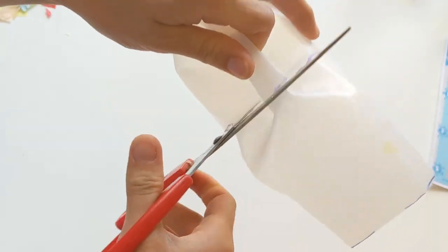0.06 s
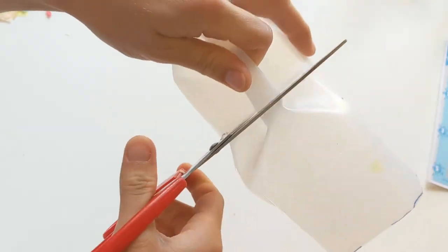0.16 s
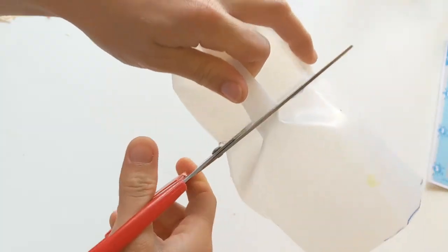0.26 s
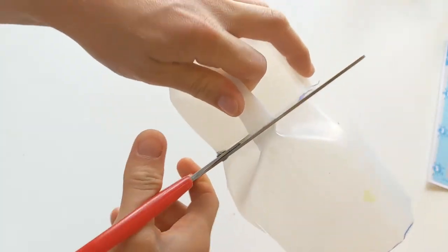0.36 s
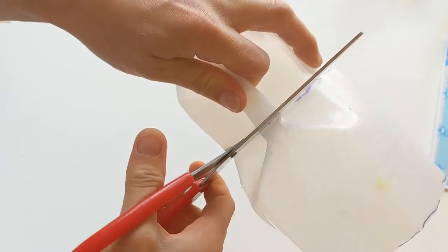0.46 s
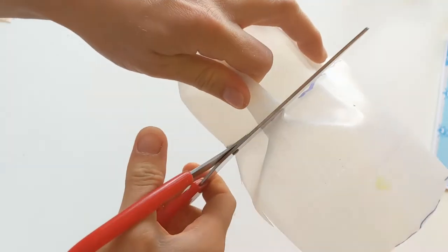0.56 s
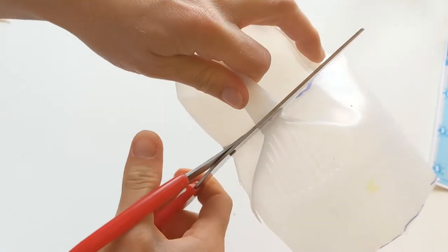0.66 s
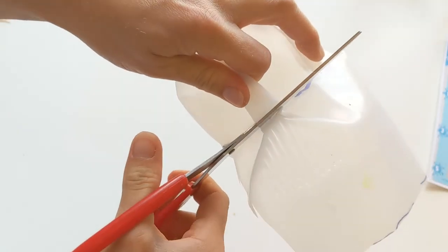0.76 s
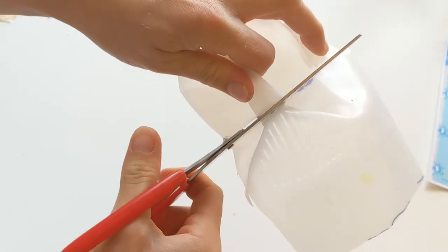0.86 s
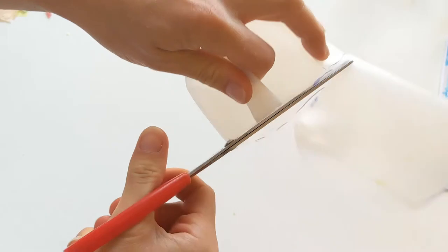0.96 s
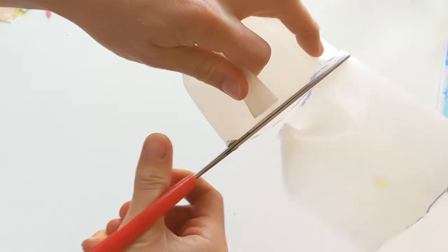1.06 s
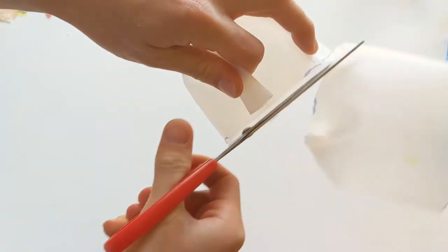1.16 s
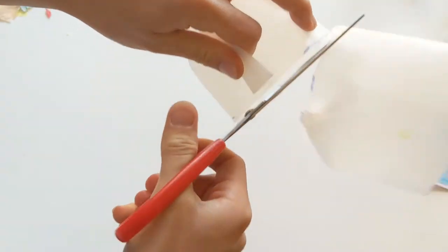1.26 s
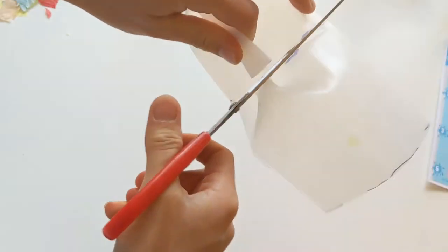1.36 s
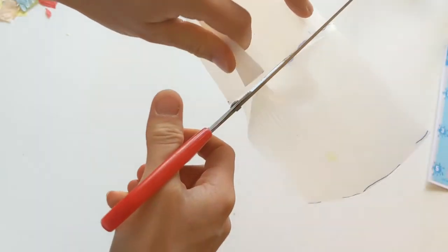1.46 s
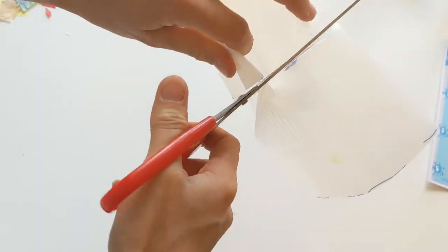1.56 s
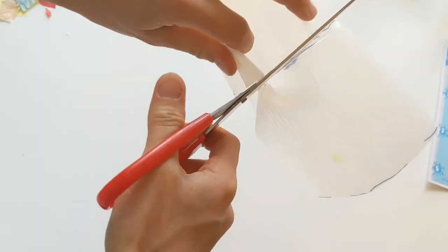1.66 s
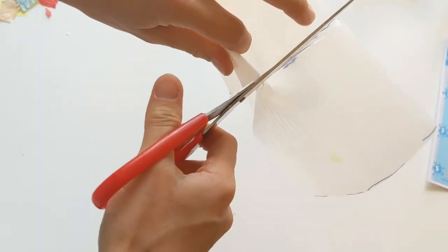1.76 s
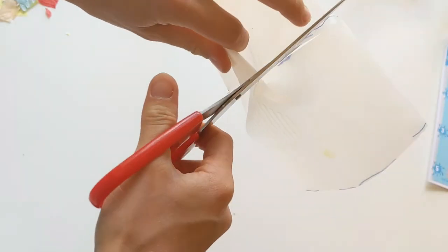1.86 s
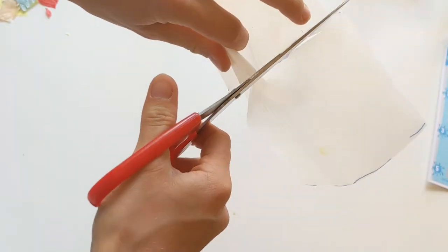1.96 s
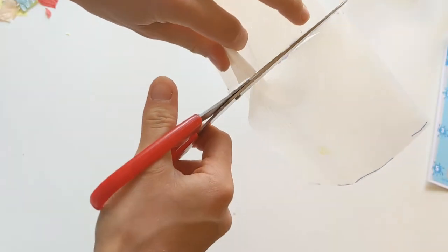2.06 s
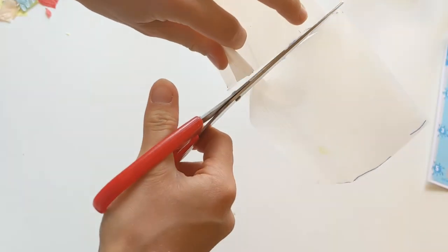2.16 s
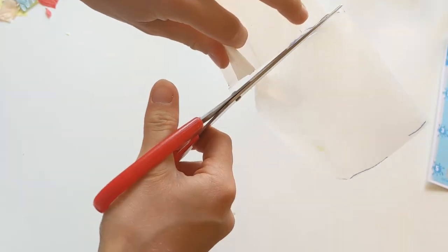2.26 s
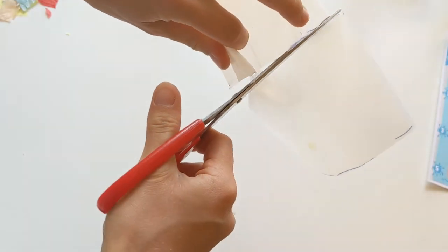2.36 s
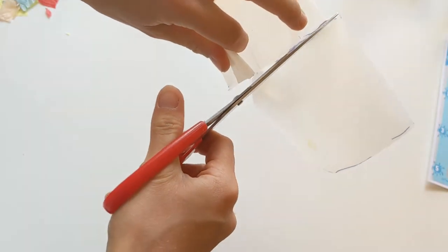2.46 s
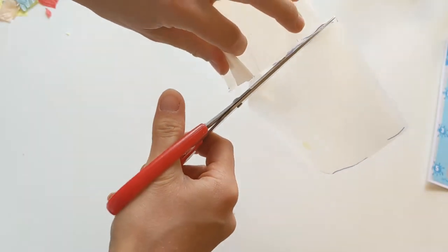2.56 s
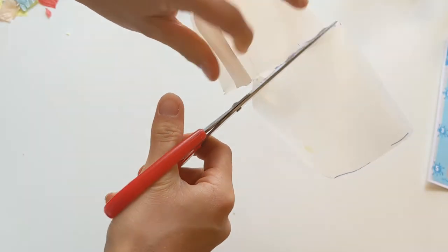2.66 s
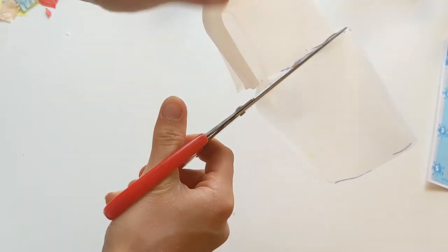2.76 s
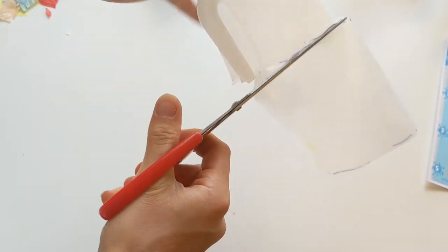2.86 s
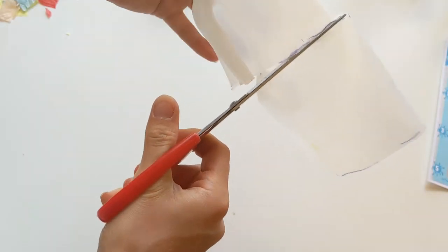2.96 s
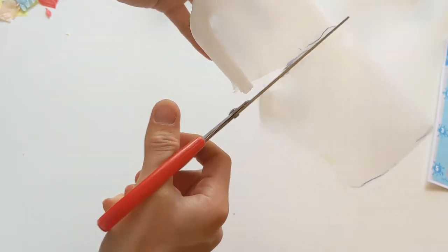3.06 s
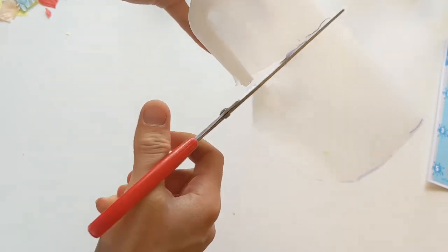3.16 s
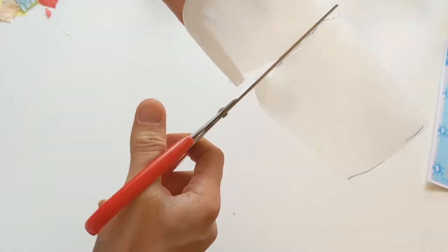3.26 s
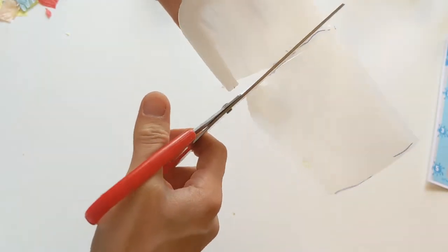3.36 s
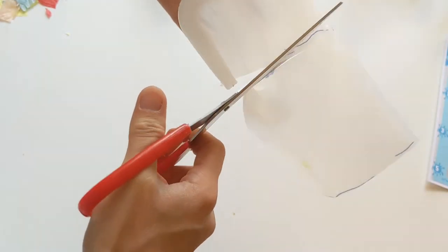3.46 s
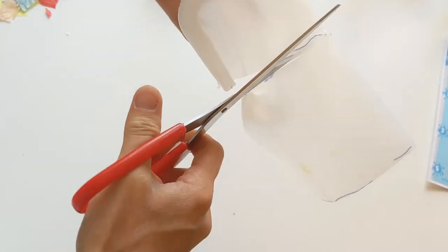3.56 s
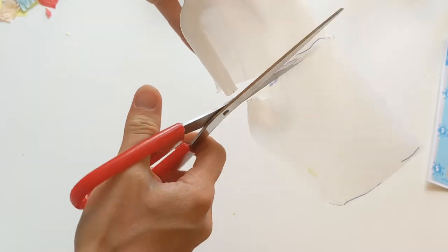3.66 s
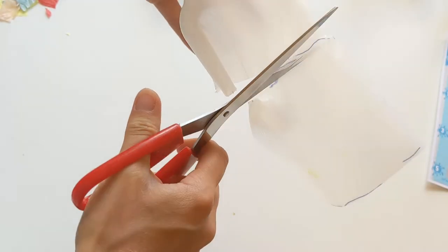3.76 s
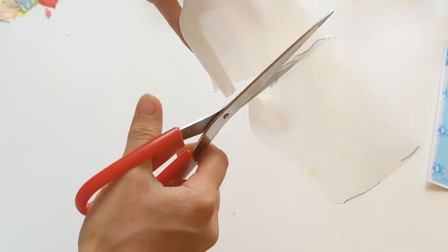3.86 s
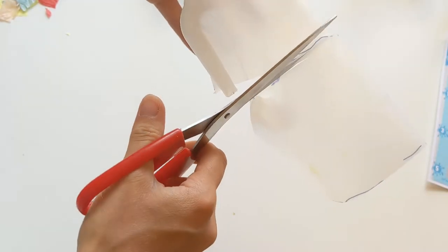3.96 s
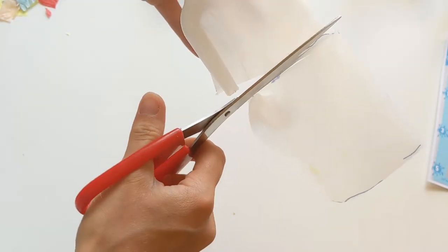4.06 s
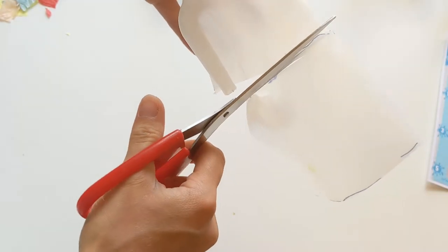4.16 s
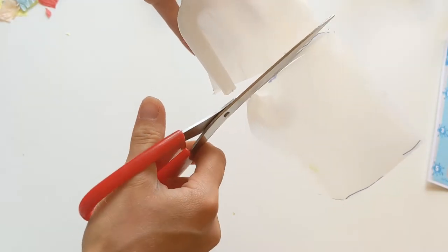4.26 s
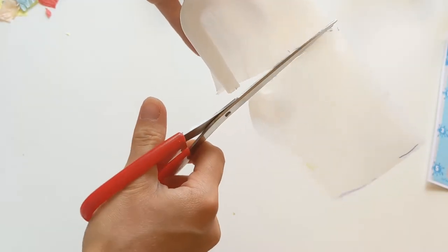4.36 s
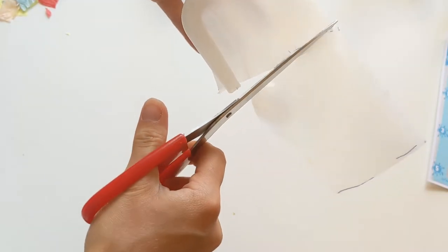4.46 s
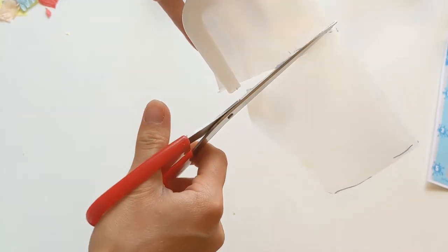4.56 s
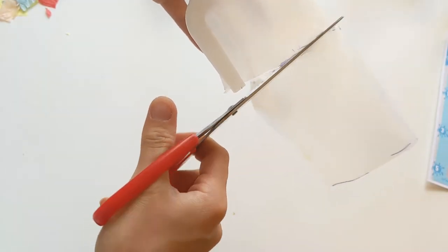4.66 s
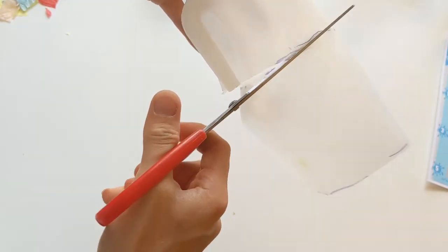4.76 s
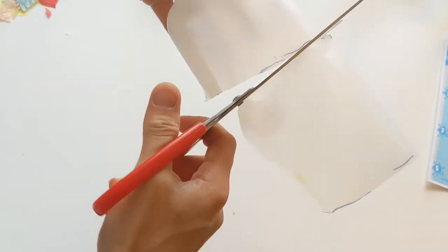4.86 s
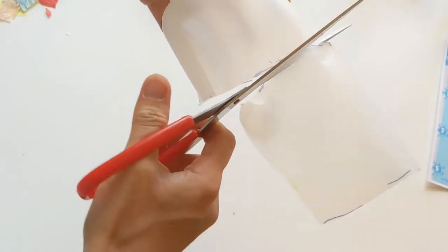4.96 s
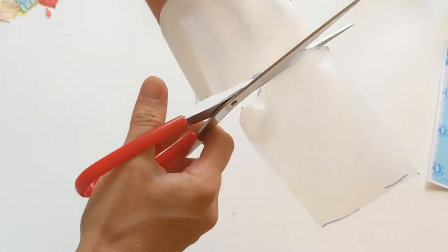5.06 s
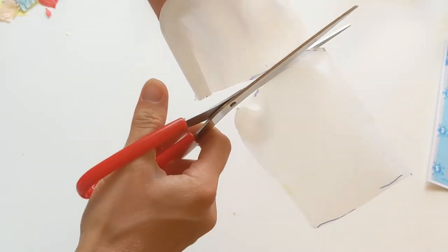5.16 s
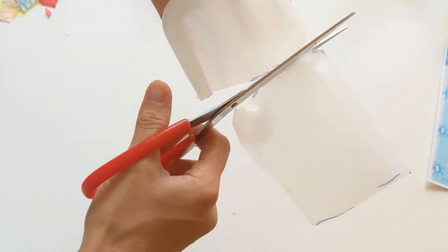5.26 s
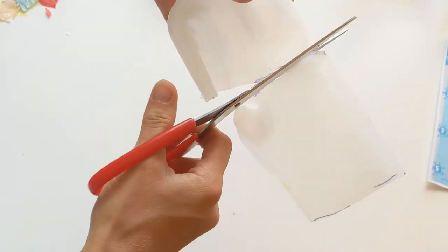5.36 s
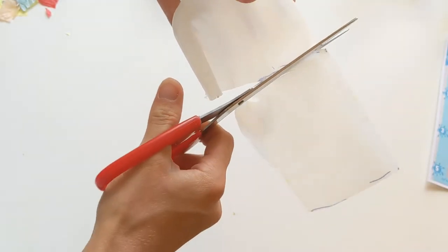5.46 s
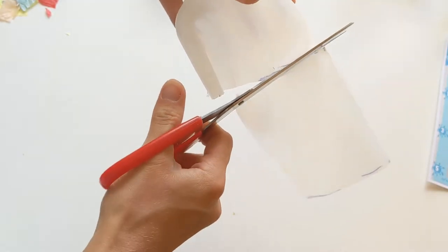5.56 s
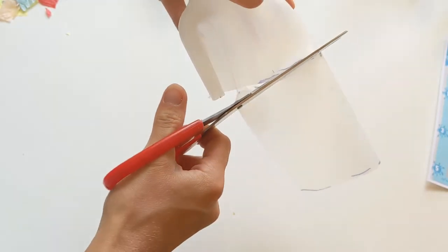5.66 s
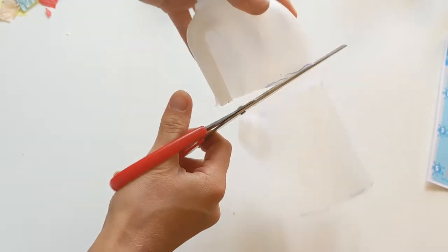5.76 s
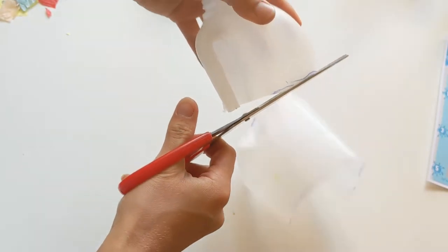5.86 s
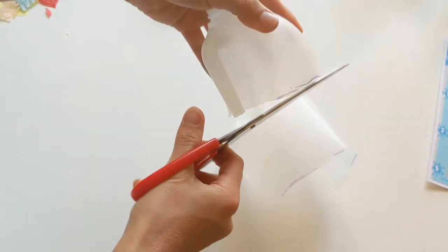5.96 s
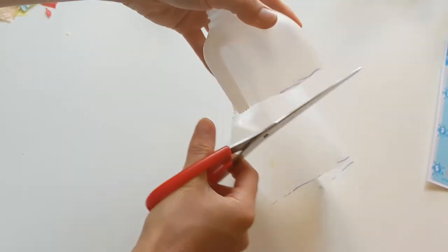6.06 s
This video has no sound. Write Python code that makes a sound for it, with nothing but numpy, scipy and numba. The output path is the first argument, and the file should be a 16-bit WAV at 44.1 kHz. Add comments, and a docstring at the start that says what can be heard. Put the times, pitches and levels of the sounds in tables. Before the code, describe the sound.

A plastic bottle is snipped with scissors in a small, quiet room. Brief dry scrapes of blade and wall alternate with hollow creaks, knocks and gritty crackling. The biggest snap bursts out at about one second; a quiet, faintly creaking middle leads to moderate ticks around 3.1 and 4.4, a bright crack near 5.2, then a rustling flurry at the end. Close two-port microphone, dull table thuds, soft background rumble.

```python
"""Steel scissors work through a stiff plastic bottle on a craft table, close to a two-port microphone.
The blades chafe along the cut, and between strokes the wall buckles, knocks and snaps.
Bursts of tiny random slips ring filters tuned to the wall, the hollow shell and the blades.
Soft pushes thud the table top, decaying noise makes the small room, and shaped noise the quiet rumble."""
import sys
import numpy as np
from scipy import signal
from scipy.fft import rfft, irfft
from scipy.io import wavfile
from scipy.ndimage import uniform_filter1d
from numba import njit

SR = 44100
rng = np.random.default_rng(int(sys.argv[2]) if len(sys.argv) > 2 else 0)


def int16_out(signal):
    """Quantize to a 16-bit WAV file."""
    q = np.round(np.clip(np.atleast_2d(signal).T, -1, 1) * 32767)
    wavfile.write(sys.argv[1], SR, q.astype(np.int16))


N = 269614  # length in samples

# Background noise, relative: pitch_hz, level_db (per Hz)
QUIET_SPECTRUM = [(15, -30), (25, 0), (50, -3.5), (100, -13.5), (200, -15), (463, -22.5), (1260, -34),
                  (1650, -29), (1940, -33.5), (7310, -32), (8360, -35.5), (9320, -34.5), (16000, -41)]
# Blades and fingers chafing along the wall, push levels before the grain:
# start_s, length_s, wall_db, blades_db (levels at the end of the stroke)
CHAFE_STROKES = [(0.0, 0.08, -55, -53.5), (0.149, 0.05, -60, -63), (0.286, 0.11, -49.5, -58),
                 (0.528, 0.26, -69, -69.5), (0.832, 0.054, -53.5, -48.5), (0.945, 0.015, -60, -39.5),
                 (1.3, 0.098, -56, -61), (1.483, 0.18, -56, -66.5), (1.811, 0.022, -58.5, -61),
                 (1.92, 0.072, -53, -58), (2.103, 0.33, -64, -62.5), (2.592, 0.1, -64, -65.5),
                 (2.963, 0.12, -53.5, -58), (3.136, 0.085, -51, -62), (3.295, 0.096, -51.5, -58.5),
                 (3.552, 0.13, -78.5, -72), (3.896, 0.16, -62.5, -68.5), (4.331, .11, -57.5, -55.5),
                 (4.71, 0.039, -52.5, -59.5), (4.826, 0.075, -50, -55), (5.008, 0.18, -59, -64.5),
                 (5.603, 0.045, -60, -59.5), (5.749, 0.021, -55.5, -60.5), (5.967, 0.094, -58.5, -48.5),
                 (6.09, 0.033, -49, -43.5)]
# Knocks, creaks and snaps, push levels before the bite:
# start_s, wall_db, shell_minus_wall_db, blades_minus_wall_db, spot_pitch_hz, length_ms
WALL_BLOWS = [(0.001, -47, 10.5, 3, 1050, 8.7), (0.064, -62, 8, -16, 1040, 29),
              (0.104, -51.5, 7, 2, 1130, 5.8), (0.159, -41, -0.5, -29, 1020, 30),
              (0.183, -38, 1, -15.5, 1040, 23.6), (0.291, -41.5, -2, -7.5, 1080, 17),
              (0.404, -57, 2, 5, 1190, 27), (0.594, -54, -5, -27, 1100, 10.5),
              (0.8865, -19.5, -3.5, -40, 1050, 2.3), (0.98, -40, -15, 14, 1420, 6.5),
              (0.9925, -14.5, -2.5, 1, 1264, 29.3), (1.338, -30.5, -9.5, -7.5, 1510, 8.2),
              (1.416, -42, -1.5, -11, 1130, 18), (1.497, -45, -11, -14, 1100, 18),
              (1.517, -46.5, 0, -3.5, 1290, 33), (1.559, -43.5, -19.5, -12, 1500, 17),
              (1.592, -45.5, -9.5, -5.5, 1320, 11.5), (1.745, -46.5, -3, -9, 1320, 29),
              (2.088, -57.5, 5, 0, 1340, 15), (2.141, -56, -5, -9, 1600, 23),
              (2.198, -52.5, -6, -5, 1320, 14), (2.259, -59, 4, -3, 1430, 27),
              (2.317, -45.5, -3.5, -4.5, 1647, 9), (2.38, -58.5, 7, -21, 1650, 17),
              (2.417, -54, 6, -11, 1306, 20), (2.549, -52, -7, -11, 1590, 21),
              (2.653, -50.5, -26, -8, 1290, 16), (2.702, -55.5, 1.5, -2, 1284, 37),
              (2.732, -43, -5.5, -15, 1170, 13), (2.767, -46, 6, -12, 1430, 13.4),
              (2.946, -47, 3, -8, 1590, 12.7), (2.993, -54.5, -1, 5.5, 1360, 28),
              (3.093, -32.5, -4, -11.5, 1160, 34.6), (3.303, -50, -3, -22, 1350, 12),
              (3.476, -48.5, -4.5, -13, 1010, 26), (3.79, -64.5, -10.5, -5, 1230, 29),
              (3.85, -49, -2.5, -9, 1174, 7), (4.041, -40, -9.5, -8.5, 1297, 11),
              (4.362, -37.5, -4, -3.5, 1420, 27), (4.402, -35.5, -5, -1, 1160, 10.3),
              (4.4095, -36.5, -13, -3.5, 1250, 10.5), (4.487, -34.5, -0.5, -10, 1470, 5.6),
              (4.701, -46, -14, -5.5, 1346, 16.4), (4.887, -33, 0.5, 1.5, 1285, 11),
              (5.099, -53, -15, -6, 1384, 12), (5.1585, -18, -9, 0.5, 1293, 7.3),
              (5.517, -58.5, 3.5, -3.5, 1290, 32), (5.59, -62.5, 2, -6.5, 1190, 27),
              (5.626, -56, 2.5, -3, 1226, 36), (5.771, -43.5, -5, -1.5, 1240, 17),
              (5.8595, -38.5, -5, 0, 1050, 34), (5.893, -40.5, -4.5, -1, 1300, 23.4),
              (5.936, -46.5, -14, 5.5, 1270, 28), (6.086, -44, -1, -14, 1190, 33),
              (6.099, -39.5, -11, -28, 1170, 10)]
# Ringing modes, relative levels; width is that of each of two filter passes: pitch_hz, width_hz, level_db
WALL_MODES = [(840, 29, -10), (1012, 240, 2), (1151, 140, 0.7), (1298, 88, -4), (1415, 560, -1.5),
              (1497, 160, -4.5), (1605, 120, -1.5), (2345, 810, -5.5)]
SHELL_MODES = [(320, 120, -6.5), (398.6, 90, 0.5), (492.2, 70, -0.1), (586.3, 120, -1.1),
               (663.5, 250, -0.5)]
BLADE_MODES = [(2794, 240, -8.5), (3060, 660, -0.5), (3580, 1500, -3.5), (4140, 440, -8.5),
               (5670, 1100, -1.5), (7366, 610, -5.5), (9650, 960, -6.5), (11600, 1900, -6.5),
               (15400, 3000, -11.5)]
# The bottle bumping the table top, push levels: start_s, level_db
TABLE_BUMPS = [(0.002, -49), (0.29, -54), (0.4, -54.5), (0.888, -49), (0.993, -26.5), (1.415, -49.5),
               (4.361, -47.5), (4.419, -48.5), (4.887, -56.5), (5.16, -56), (5.627, -57.5), (5.77, -52.5),
               (5.858, -49), (5.896, -41.5), (5.939, -44), (6.089, -50)]
# Low ringing modes of the table top, relative levels: pitch_hz, width_hz, level_db
TABLE_MODES = [(28, 3.7, 1), (45.2, 4.3, 2.5), (91, 26, -3.5), (144, 36, -1.5), (172, 16, 4)]
# Bands of the room tail, relative levels; decay is the time to fall 60 dB: pitch_hz, decay_s, level_db
ROOM_BANDS = [(238, 0.38, -2.5), (530, 0.45, -3.5), (960, 0.3, -6.5), (1980, 0.4, -3), (4050, 0.33, 2.75),
              (7900, 0.25, 5), (14000, 0.23, 7.5)]

QUIET_DB = -64  # middle level of the background, which wavers around it
SLIPS_PER_S, SLIP_SCATTER_DB = 9000, 1.5
# A stroke sets in, grows as the blades close, then lets go
TOUCH_DB_PER_S, SWELL_DB, RELEASE_DB_PER_S = 502, 6.5, 305.5
GRAIN_DB = 5  # the chafing catches and frees
CHAFE_SHELL_DB = -3  # the shell answers the chafing a little under the wall
CHAFE_RING_DB = -4.5  # chafing tears the edge more than it rings the blades
RISE_MS, BLADE_RISE_MS = 0.2, 0.43  # contact times of a 0 dB blow; the blades take the load more slowly
RISE_DOUBLES_DB = 22.5  # every so many dB softer, the contact lasts twice as long
BITE, BITE_MS = 1.4, 0.67  # extra push at first contact (share of the rest), and how fast it fades
SAG = 0.84  # steady fade over a blow's length, as a power of e, before it lets go
FLEX_DB = 2  # how much the bottle's flexing changes each mode
SPOT_DB, SPOT_OCTAVES = 10.5, 0.2  # modes near the pitch of the struck spot stand out
PORT_TURNS = 0.4  # largest lag or lead between the ports, in cycles of a mode
KNOCK_DB = 8  # dull, quickly damped part of each push on the wall
CRACKLE_DB = 4  # broad treble of the tearing edge
LEFT_DB = 6  # the left port is nearer, so it is this much louder
ROOM_DB, ROOM_GAP_MS = -2.5, 3.7  # tail level, and time scale of its build-up
ROOM_ALIKE = 0.23  # share of the tail's power common to both ports
TOP_HZ = 15900  # treble limit


def undb(db):
    """Decibels to gain."""
    return 10 ** (np.asarray(db) / 20)


def unit(x):
    """Scale to an average (rms) strength of 1."""
    return x / np.sqrt(np.mean(x ** 2))


@njit
def band_pass(x, hz, width):
    """State-variable band-pass filter: a damped resonator with gain 1 at its centre."""
    y, band, low = np.empty(len(x)), 0., 0.
    g, damping = np.tan(np.pi * hz / SR), width / hz
    for i in range(len(x)):
        v = (band + g * (x[i] + 1e-18 - low)) / (1 + g * (g + damping))
        band, low = 2 * v - band, low + 2 * g * v
        y[i] = damping * v
    return y


def band_pass_twice(x, hz, width):
    """Two resonators in a row give a rounder onset and steeper sides."""
    return band_pass(band_pass(x, hz, width), hz, width)


def walk(rate):
    """Random levels, about rate new ones a second, joined by straight slopes; typical spread 0.7."""
    hold = max(int(SR / rate), 600)
    steps = np.repeat(rng.standard_normal(N // 500), hold)
    return 0.87 * uniform_filter1d(steps, hold)[:N]


def quiet():
    """Room rumble, nearly alike at both ports, and microphone hiss: shaped noise that slowly wavers."""
    hz = np.arange(N // 2 + 1) * SR / N + 1
    pitch_hz, level_db = np.array(QUIET_SPECTRUM).T
    colour = undb(np.interp(np.log(hz), np.log(pitch_hz), level_db))
    mid, side = (rfft(rng.standard_normal(N)) * colour for _ in range(2))
    side = side * np.clip(hz / 500, .1, 1)  # the bass differs little between ports
    noise = unit(np.array([irfft(mid + side, N), irfft(mid - side, N)]))
    return undb(QUIET_DB + 3.0 * walk(4)) * noise


def slips():
    """Irregular stick-slip clicks of either sign, a few larger than the rest."""
    when, sign, size = rng.random(N), rng.standard_normal(N), rng.exponential(size=N)
    return unit((when < SLIPS_PER_S / SR) * sign * undb(SLIP_SCATTER_DB * size))


def chafing():
    """Rubbing pushes on wall, shell, blades and tearing edge (4 rows), each catching and freeing."""
    t, rub = np.arange(N) / SR, 0
    for start_s, length_s, wall_db, blades_db in CHAFE_STROKES:
        swell_db = SWELL_DB * (np.clip((t - start_s) / length_s, 0, 1) - 1)
        touch_db = TOUCH_DB_PER_S * np.maximum(start_s - t, 0)
        release_db = RELEASE_DB_PER_S * np.maximum(t - start_s - length_s, 0)
        parts_db = [[wall_db], [wall_db + CHAFE_SHELL_DB], [blades_db + CHAFE_RING_DB], [blades_db]]
        rub = rub + undb(parts_db) * undb(swell_db - touch_db - release_db)
    return rub * undb([GRAIN_DB * walk(45) for part in rub])


def blows():
    """Sudden pushes on the same four parts, softer ones rising slower, and the pitch of the last spot."""
    push = np.zeros((4, N))
    spot_hz = np.full(N, 1. * WALL_BLOWS[0][4])
    rise_ms = np.array([[RISE_MS], [RISE_MS], [BLADE_RISE_MS], [BLADE_RISE_MS]])
    bitten = np.array([[1], [1], [0], [0]])  # only wall and shell get the extra first push
    for start_s, wall_db, shell_db, blades_db, hz, length_ms in WALL_BLOWS:
        i = int(start_s * SR)
        ms = np.arange(min(N - i, SR // 8)) * 1000 / SR
        bite = 1 + BITE * bitten * np.exp(-ms / BITE_MS)
        rise = np.minimum(ms / rise_ms * 2 ** (wall_db / RISE_DOUBLES_DB), 1)
        progress = ms / max(length_ms, 1)
        fade = np.exp(-SAG * progress - progress ** 4)  # the fourth power lets go at the end
        level = undb(wall_db + np.array([0, shell_db, blades_db, blades_db]))[:, None]
        push[:, i:i + len(ms)] += level * rise * fade * bite
        spot_hz[i:] = hz
    return push, spot_hz


def ring(push, spot_hz, clicks, modes):
    """The clicks ring the modes; as the bottle flexes each mode takes up more or less of the push."""
    out, power = 0, 0
    for (hz, width, db), (place, lag) in zip(modes, rng.random((len(modes), 2))):
        octaves_off = np.log2(hz / spot_hz)
        gain = undb(db + SPOT_DB * np.exp(-(octaves_off / SPOT_OCTAVES) ** 2))
        # each mode gets its own stretch of the clicks
        drive = np.roll(clicks, int(place * N)) * undb(FLEX_DB * walk(11)) * push * gain
        # the square root evens out loudness between narrow and wide modes
        tone = band_pass_twice(drive, 1. * hz, 1. * width) / np.sqrt(np.pi * width / 2 / SR)
        lag_samples = (2 * lag - 1) * PORT_TURNS * SR / hz
        far_tone = np.interp(np.arange(N) - lag_samples, np.arange(N), tone)
        out = out + np.array([tone, far_tone])
        power = power + gain ** 2
    return out / np.sqrt(power)


def bottle():
    """Wall, hollow shell and blades ring on four sides, each side with its own crackle of tearing."""
    blow_push, spot_hz = blows()
    push, clicks = chafing() + blow_push, slips()
    body = sum(ring(p, spot_hz, clicks, modes)
               for p, modes in zip(push, (WALL_MODES, SHELL_MODES, BLADE_MODES)))
    body = body + undb(KNOCK_DB) * band_pass_twice(push[0] * clicks, 1300.0, 880.0)
    crackle = np.array([band_pass(push[-1] * slips(), 5000.0, 6000.0) for side in range(4)])
    return np.tile(body, (2, 1)) + undb(CRACKLE_DB) * crackle


def table():
    """Soft pushes of about 3 ms ring the low modes of the table top, alike at both ports."""
    start_s, level_db = np.transpose(TABLE_BUMPS)
    push = np.zeros(N)
    push[(start_s * SR).astype(int)] = undb(level_db)
    push = np.convolve(push, np.hanning(130))[:N]
    return 2.94 * sum(undb(db) * band_pass(push, 1. * hz, 1. * width) for hz, width, db in TABLE_MODES)


def room_tail(noise, t):
    """Bands of noise swell together, then each dies away at its own rate."""
    swell = 1 - np.exp(-(t * 1000 / ROOM_GAP_MS) ** 2)
    return swell * sum(undb(db - 60 * t / decay_s) * band_pass(noise, 1. * hz, .7 * hz)
                       for hz, decay_s, db in ROOM_BANDS)


def room(sides):
    """Blurred echoes: every side of the bottle finds its own walls, so it gets its own random tail."""
    t = np.arange(SR // 2) / SR
    out = 0
    for x in sides:
        shared, *own = rng.standard_normal((3, len(t)))
        ports = [np.sqrt(ROOM_ALIKE) * shared + np.sqrt(1 - ROOM_ALIKE) * noise for noise in own]
        tails = np.array([room_tail(p, t) for p in ports])
        tails = tails / np.sqrt(np.sum(tails[0] ** 2))
        out = out + signal.fftconvolve(x[None], tails, axes=1)[:, :N]
    return undb(ROOM_DB) * out / np.sqrt(len(sides))


def scene():
    """The bottle on its table, in the room; its first two sides face the ports."""
    sides = bottle()
    direct = sides[:2] * undb([[LEFT_DB / 2], [-LEFT_DB / 2]])
    return direct + room(sides) + table() + quiet()


def record(dry):
    """Round the loudest peaks, then cut the treble steeply above TOP_HZ."""
    rounded = .9 * np.tanh(dry / .9)
    return signal.sosfilt(signal.ellip(12, .2, 95, TOP_HZ, fs=SR, output="sos"), rounded)


dry = scene()
out = record(dry)
int16_out(out)
```